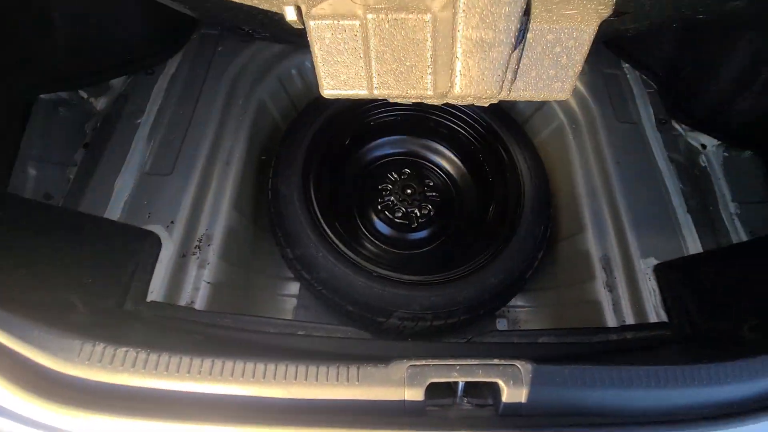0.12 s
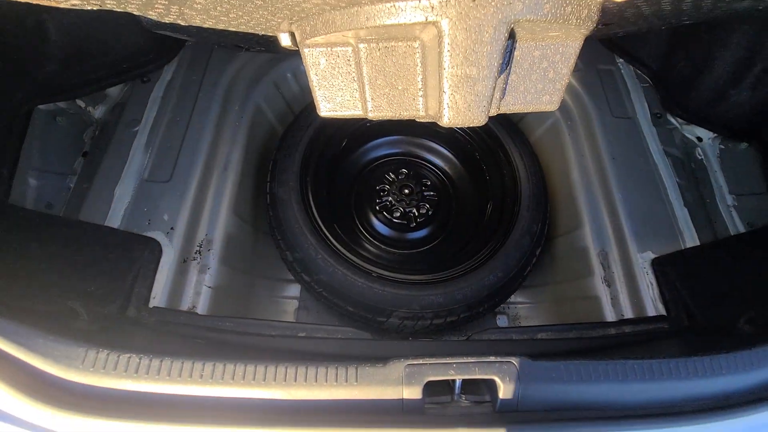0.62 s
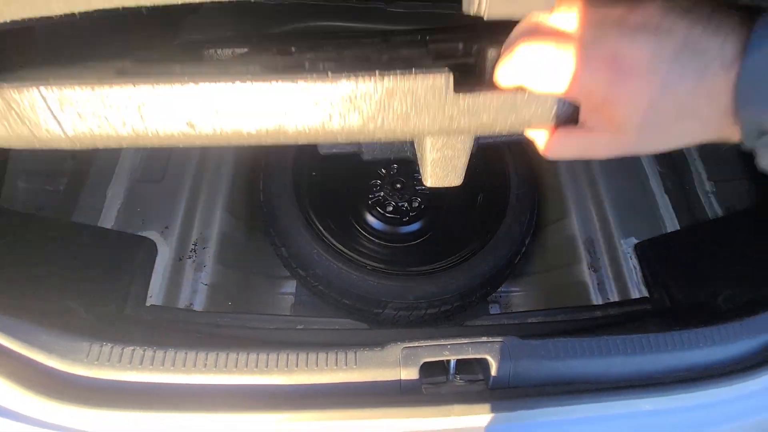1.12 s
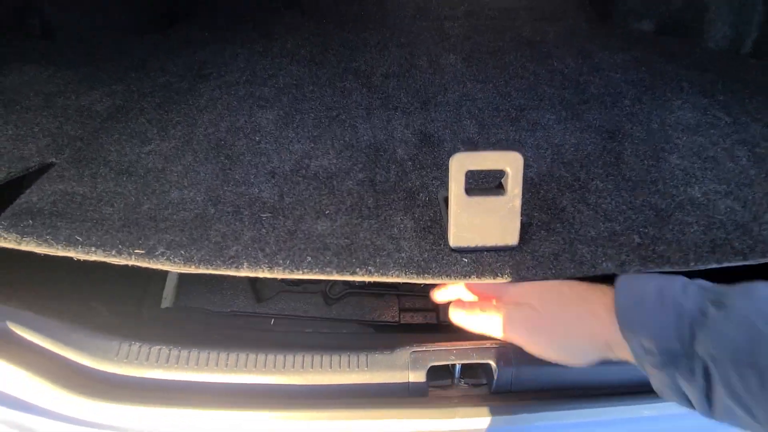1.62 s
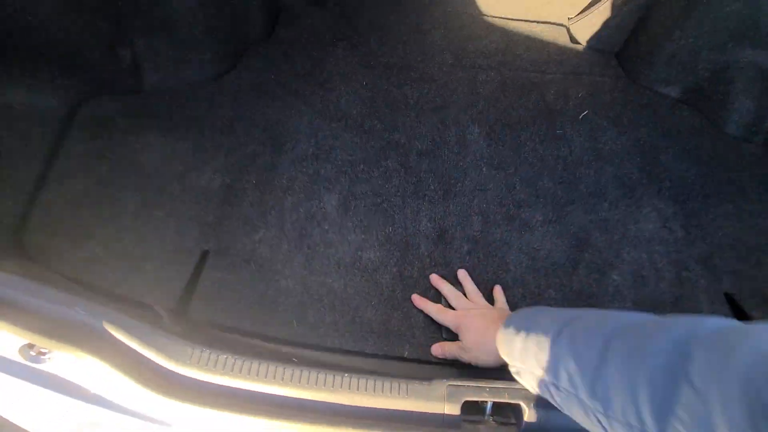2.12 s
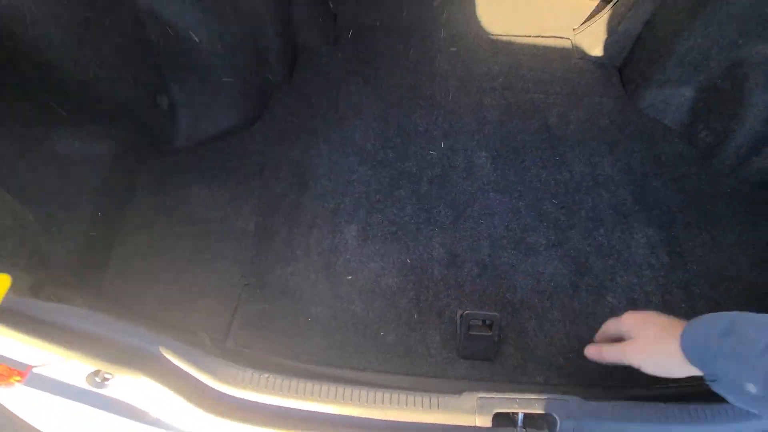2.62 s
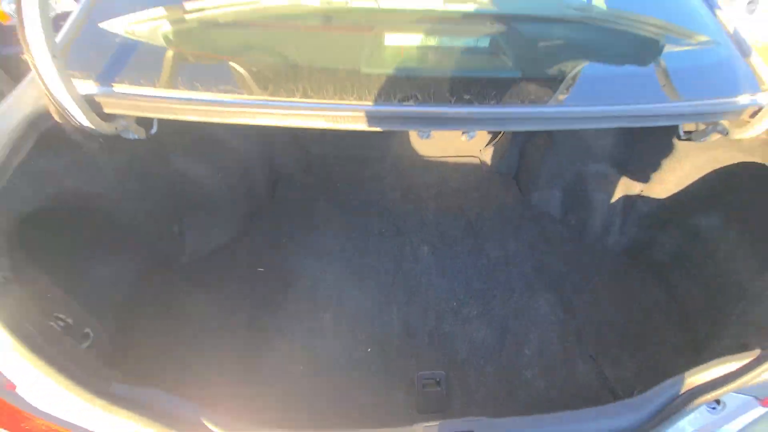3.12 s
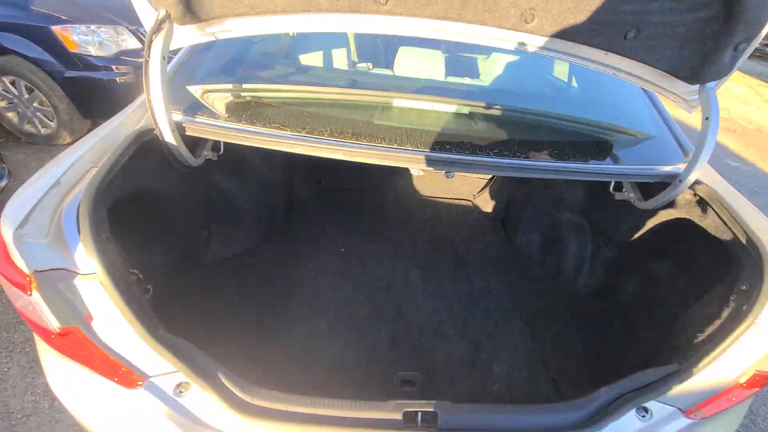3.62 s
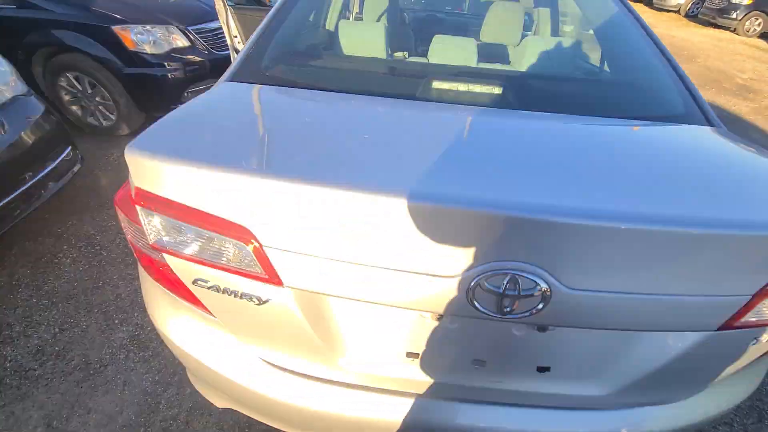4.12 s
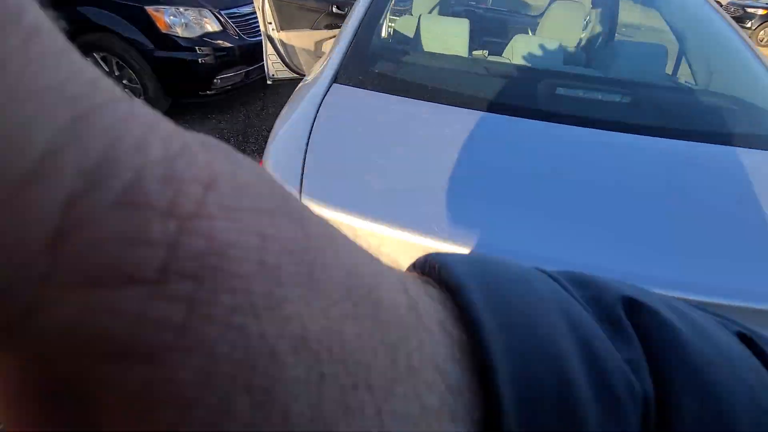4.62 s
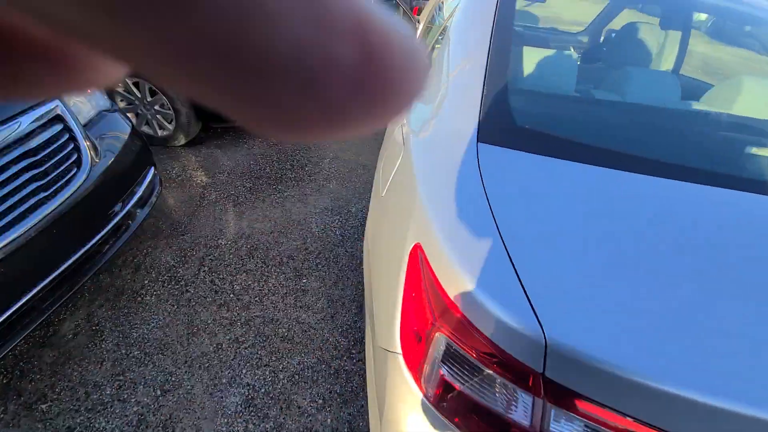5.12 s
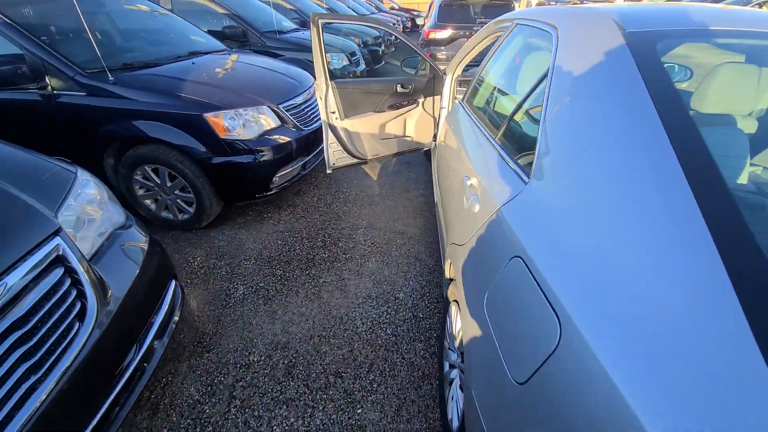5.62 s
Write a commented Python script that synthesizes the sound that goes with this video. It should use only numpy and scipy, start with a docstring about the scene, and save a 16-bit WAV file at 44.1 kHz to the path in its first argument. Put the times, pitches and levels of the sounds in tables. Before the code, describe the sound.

Outdoors in a car park, heard very close in stereo, low distant traffic rumbles and soft tyre wash wavers beneath. From 0 to 0.3 seconds the boot floor board gives abrupt hollow thumps, sharp ticks and coarse carpet scraping, then it falls nearly quiet. A faint bump comes at 1.1. From about 1.45 to 1.8 the board drops and slides in a dense clatter of dull thuds, edge knocks and shuddering drag. Lighter thumps at 2.1 to 2.6, strongest near 2.26, settle it. Faint scuffs and rustle follow around 3 to 3.4. At about 4.27 the lid slams: a deep steel boom with a hard latch clank, small rebounds and a fading rattle. From 4.65 sleeves rustle; between 4.9 and 5.3 grit snaps and crunches toward the left, with a heel knock near 5.03. Small scuffs and a faint low hum end it.

```python
"""Car boot floor and lid slam

Outdoors in a car park a hand drops and pats down a carpeted boot floor board, then slams the lid.
Decaying pushes ring damped modes: the board thumps, the lid booms, its latch clanks and a heel knocks.
Shaped noise makes the rustle of sleeves and carpet, crunching grit, far traffic and humming machinery.
Two close microphones share the bass and differ in the treble."""
import sys
import numpy as np
from scipy import signal
from scipy.fft import rfft, irfft, next_fast_len
from scipy.io import wavfile
from scipy.ndimage import uniform_filter1d

SR = 44100
rng = np.random.default_rng(int(sys.argv[2]) if len(sys.argv) > 2 else 0)


def unload_wav(signal):
    """Save mono or channel-first audio to the path in sys.argv[1] as 16-bit WAV at rate SR, clipped to [-1, 1]."""
    wavfile.write(
        sys.argv[1],
        SR,
        np.round(np.clip(np.atleast_2d(signal).T, -1, 1) * 32767).astype(np.int16),
    )


def voltage_ratio(level):
    """Linear amplitude factor for a level in decibels (scalar or array-like)."""
    return 10 ** (np.asarray(level, float) / 20)


N = 253575
T = np.arange(N) / SR

# left-right difference against the shared sound: f/Hz, level/dB
SIDE_SHARE = [(30, -27.5), (130, -11.5), (280, -10), (500, -0.5), (800, 0), (16000, 0.5)]
# boot sound reaches the right microphone round the housing: f/Hz, phase lag/rad
RIGHT_LAG = [(200, 0), (350, .6), (600, 1.3), (1000, 1.6), (16500, 1.6)]

# surroundings: t/s, rumble level/dB, tyre wash level/dB
SURROUNDINGS = [(0.0, -26, -50), (0.2, -30, -45.5), (0.5, -34.5, -46.5), (0.83, -31, -45),
                (1.1, -33.5, -44), (1.36, -29.5, -41), (1.75, -39, -41), (1.86, -42.5, -71),
                (2.07, -34.5, -47.5), (2.26, -26.5, -41), (2.42, -29, -69), (2.56, -37, -59),
                (2.91, -42, -51.5), (3.15, -40, -46.5), (3.55, -39, -47.5), (4.0, -40.5, -44),
                (4.3, -40.5, -41.5), (4.68, -40.5, -47), (5.06, -39.5, -48), (5.56, -45.5, -45.5),
                (5.75, -31, -43.5)]
# colour of the rumble: f/Hz, relative level/dB
RUMBLE_COLOUR = [(8.8, -57), (15, 8), (65, 12), (94, 5.5), (135, -3.5), (156, -4), (193, -18.5), (242, -5),
                 (300, -26), (390, -41), (660, -120)]
# colour of the tyre wash: f/Hz, relative level/dB
WASH_COLOUR = [(76, -33), (130, -3.5), (156, 4), (191, -1.5), (239, 0.5), (298, -8), (439, -11),
               (495, -7.5), (571, -12.5), (874, -11.5), (2660, -27), (7190, -62), (7800, -68), (15200, -45),
               (16500, -76)]
# machinery hums: f/Hz, looseness/Hz (3.9 / t60), level/dB, start t/s
HUMS = [(161.4, 4.8, -51, 2.57), (248.4, 1.2, -45.5, 5.03), (520.5, 7.3, -63, 2.63), (255.5, 46, -66, 0.5)]
# broad band heard while the microphones are deep in the boot: f/Hz, width/Hz, level/dB, end t/s
BOOT_WELL = (850, 300, -52, 1.1)

# strokes of cloth and carpet: peak t/s, swell/s, fade/s, hiss level/dB, scrape level/dB
STROKES = [(0.036, 0.11, 0.081, -33, -31), (0.151, 0.027, 0.066, -34, -22.5),
           (0.225, 0.062, 0.019, -43, -29), (0.29, 0.025, 0.047, -45.5, -34.5),
           (1.31, 0.27, 0.17, -41, -42.5), (1.445, 0.18, 0.053, -38.5, -34),
           (1.477, .012, 0.074, -37, -25.5), (1.671, 0.048, 0.11, -33, -50), (1.739, 0.09, 0.034, -49, -52),
           (2.09, 0.045, 0.25, -42, -49), (2.184, 0.16, 0.12, -38.5, -44.5),
           (3.371, 0.067, 0.15, -52.5, -42.5), (3.9, 0.28, 0.18, -49.5, -53.5),
           (4.654, 0.086, 0.12, -52, -41.5), (4.735, 0.08, 0.073, -43.5, -40),
           (4.78, 0.069, 0.043, -51, -45.5), (4.956, .12, 0.16, -46, -45), (5.054, 0.15, .2, -56, -55),
           (5.28, 0.091, 0.27, -51.5, -52.5)]
# faint rustle between strokes: t/s, hiss level/dB, scrape level/dB
RUSTLE = [(0.0, -52, -41), (0.39, -60, -67), (0.56, -71, -72.5), (0.96, -91, -69.5), (1.02, -62.5, -57.5),
          (1.1, -57.5, -48), (1.6, -48.5, -67), (1.8, -59, -72), (1.88, -70.5, -80), (1.97, -57.5, -78),
          (2.3, -58.5, -60), (2.5, -54, -53.5), (2.8, -65.5, -63.5), (3.13, -62, -57.5), (3.3, -62, -55.5),
          (3.5, -68, -62), (4.07, -65, -62), (4.22, -65.5, -61), (4.43, -55, -57), (4.85, -61, -62),
          (5.2, -54.5, -58), (5.45, -71.5, -55.5), (5.75, -60, -59.5)]
# where the rubbing sits: t/s, left minus right/dB
RUB_PAN = [(0.0, 1.5), (2.5, -1), (2.7, -2.5), (3.4, -10.5), (3.55, -4), (3.95, -7.5), (4.2, -4), (4.32, 8),
           (4.46, -5), (4.7, -18), (4.79, -15), (4.86, 10), (4.97, 3), (5.07, -2.5), (5.75, -1)]
# colour of the fine hiss: f/Hz, relative level/dB
HISS_COLOUR = [(1760, -25), (3000, -3), (5090, -10), (6620, -1.5), (8380, -9.5), (10500, -7), (11400, -2.5),
               (13300, -3.5), (15100, 4.5), (16200, -36), (16500, -49)]
# colour of the coarse scrape: f/Hz, relative level/dB
SCRAPE_COLOUR = [(240, -8.5), (400, -5.5), (746, -4.5), (962, -8), (1280, -7.5), (1380, -6), (2290, -12),
                 (3280, -10), (5000, -20.5), (6500, -27), (11000, -120)]

# hard ticks and the loudest stones: t/s, peak level/dB, centre f/Hz, snap level/dB, left minus right/dB
TICKS = [(0.1451, -8, 2980, -42, 2), (0.1605, -13.5, 3320, -16, -3), (0.1704, -23, 1670, -40, 1),
         (0.3734, -54, 1590, -29.5, -1.5), (0.992, -38, 1525, -36.5, 7), (1.2322, -36, 2620, -43, 3),
         (2.278, -32, 3030, -26, 2), (2.8903, -43, 1510, -63, 13), (3.1677, -40.5, 2270, -48, -10),
         (4.124, -39, 3420, -61, 8), (4.4595, -38.5, 1550, -62, 8), (4.9002, -31, 2200, -16.5, 21),
         (4.924, -28, 2250, -42, 19), (4.9496, -30, 3480, -46, 12), (4.9636, -27.5, 2550, -49, 17),
         (5.005, -27, 3600, -34, 11.5), (5.027, -26, 3020, -26, 17), (5.1603, -33.5, 2250, -30.5, 15.5),
         (5.218, -43, 1690, -60, 2)]
# soles scuffing briefly: t/s, peak level/dB, centre f/Hz
SCUFFS = [(0.2244, -42, 1640), (1.1704, -55, 1580), (2.089, -45, 1050), (3.003, -41, 1410),
          (3.0165, -37.5, 1350), (3.0347, -40.5, 1280), (3.6776, -37, 1390), (5.344, -38.5, 1670),
          (5.425, -32.5, 1340), (5.5183, -47, 1210)]
# ringing of one snapped stone: f/Hz, t60/s, relative level/dB
STONE_MODES = [(3320, 0.01, -6.5), (3980, 0.014, -1.5), (5480, 0.011, -7), (6660, 0.011, 0.5),
               (7440, 0.0093, -6)]
# ringing of the heel: f/Hz, t60/s, relative level/dB
HEEL_MODES = [(440, 0.019, -6), (816, 0.016, -1.5), (1115, 0.011, 0.5)]

# the lid lands, latches and bounces: t/s, panel peak level/dB, latch peak level/dB
LID_HITS = [(4.263, -26, -35), (4.275, -3, -10), (4.283, -3, -3.5), (4.293, -7, -20), (4.303, -9.5, -30),
            (4.326, -43, -24), (4.348, -10, -25.5), (4.37, -17.5, -49), (4.4, -22, -34),
            (4.439, -16.5, -37)]
# lid panel modes: f/Hz, t60/s, relative level/dB
LID_MODES = [(38.6, 0.28, 0), (79, 0.16, 0), (124.2, 0.57, -10.5), (170, 0.18, -7.5), (216, 0.32, -13),
             (264.5, 0.38, -11), (322, 0.11, -5), (387.6, 0.31, -7), (486, 0.22, -7.5), (559, 0.6, -11),
             (640, .15, -23), (768, 0.29, -11.5), (877, 0.1, -8.5)]
# latch modes: f/Hz, t60/s, relative level/dB
LATCH_MODES = [(640, .03, 0), (780, .03, -1), (1040, .03, 0), (1220, .02, -1), (1400, .02, -1),
               (1600, .02, -1), (1850, .015, -3), (2200, .012, -3), (2700, .015, -3), (3150, .02, -5),
               (3300, .025, -4), (3480, .015, -6), (4100, .008, -8), (5000, .006, -9)]
# colour of the lid's rattle: f/Hz, relative level/dB
BUZZ_COLOUR = [(100, -20), (200, -3), (400, 0), (850, 0), (1300, -13), (3300, -20), (4500, -32),
               (12000, -38), (16500, -40)]

# blows on the board: t/s, board peak level/dB, favoured f/Hz, boom peak level/dB, knock peak level/dB
BLOWS = [(0.016, -8, 101, -19, -21), (0.022, -7.5, 115, -29, -13), (0.144, -6.5, 102.4, -29, -23),
         (0.157, -13, 127, -25, -36), (0.169, -14.5, 407, -31, -27), (0.185, -15.5, 412, -35, -14.5),
         (0.217, -30, 103, -19, -23), (1.129, -25, 114, -32, -42), (1.475, -3.5, 327, -35, -15.5),
         (1.486, -5.5, 394, -25, -9), (1.506, -8.5, 150, -19, -14), (1.533, -12, 164, -10, -23),
         (1.576, -8, 148, -15, -21.5), (1.602, -6.5, 262, -12, -19), (1.644, -8.5, 190, -36, -11.5),
         (1.665, -3.5, 276, -28, -9), (1.710, -7.5, 244, -29, -10), (1.733, -5, 295, -37, -8.5),
         (1.75, -14, 170, -22, -20.5), (1.779, -15.5, 307, -28, -45), (1.791, -14.5, 131, -19.5, -36),
         (2.114, -24.5, 178, -43, -40), (2.159, -24.5, 220, -40, -29), (2.257, -10.5, 196, -12.5, -20),
         (2.276, -14, 283, -27, -18), (2.299, -18.5, 158, -32, -50), (2.358, -24, 159, -33, -41),
         (2.394, -21, 158, -33, -52), (2.466, -22.5, 144, -51, -48), (2.615, -17.5, 169, -43, -27),
         (3.275, -31, 180, -43, -55), (3.407, -29.5, 160, -46, -50)]
# low boom modes of the boot: f/Hz, t60/s, relative level/dB
BOOM_MODES = [(47, 0.19, 1.5), (62.8, 0.099, 8), (93.8, 0.43, -4.5)]
# board modes: f/Hz, t60/s, relative level/dB
BOARD_MODES = [(105.4, 0.13, -3.5), (122.8, 0.15, -2), (167.4, 0.18, -3.5), (217.2, 0.079, 0),
               (267, 0.091, 1.56), (313, 0.089, 1.5), (369, 0.072, 0.9), (408, 0.075, -0.7),
               (451, 0.058, 0.8), (530, 0.061, 2.5)]
# knocking modes of the board's edge: f/Hz, t60/s, relative level/dB
EDGE_MODES = [(620, .03, 0), (740, .03, -1), (880, .02, -2), (1020, .018, -2), (1180, .016, -2),
              (1370, .014, -3), (1620, .012, -4), (1900, .01, -5), (2300, .009, -7), (2750, .008, -9),
              (3300, .008, -11), (3900, .006, -16)]
# shudder of the sliding board: t/s, level/dB
SHUDDER = [(0.0, -24), (0.08, -34), (0.248, -33.5), (0.4, -53), (0.5, -77), (1.0, -71), (1.176, -42),
           (1.29, -43.5), (1.518, -29.5), (1.63, -23), (1.678, -14), (1.792, -30), (1.858, -54.5),
           (2.096, -49.5), (2.266, -27), (2.332, -43), (2.45, -47.5), (2.75, -61), (3.0, -74)]

STROKE_DEPTH_DB = 20  # drop over one swell or fade time
STROKE_ROUNDING = 1.25  # 1 = pointed peak, more = flatter top
TICK_WIDTH = 1.35  # band edges lie this ratio either side of the centre
TICK_CONTACT_S, SCUFF_CONTACT_S, SCUFF_PAN_DB = 0.00098, 0.018, 10
# grit crunches as the weight rolls over a shoe, fading
GRIT_FROM_S, GRIT_TO_S, GRIT_DB, GRIT_FADE_DB_PER_S = 4.935, 5.3, -29, 40
GRIT_HZ, GRIT_SNAP_UNDER_DB, GRIT_PAN_DB = 2700, 20, 15.5
GRIT_BUNCHING = 2.4  # above 1, stones crowd at the start
STONE_S, STONE_DB, STONE_PAN_DB = 4.9003, -14, 13
HEEL_S, HEEL_DB = 5.026, -11
BUZZ_FROM_S, BUZZ_DB, BUZZ_T60_S = 4.29, -25, 0.8
CRACK_UNDER_LATCH_DB, CRACK_UNDER_KNOCK_DB = 10, 16
CHATTER_S = 0.0084  # decay of the edge's rattling contact
SLAP_LO_HZ, SLAP_HI_HZ, SLAP_S, SLAP_UNDER_KNOCK_DB = 500, 950, 0.007, 6
SHUDDER_BOOM_DB, SHUDDER_EDGE_DB = -11, -13.5  # against the board's own shudder


def shape(x, table):
    """Colours a sound by f/Hz, level/dB points joined over log frequency."""
    hz, db = np.transpose(table)
    size = next_fast_len(N)
    f = np.maximum(np.fft.rfftfreq(size, 1 / SR), 1)
    gain = voltage_ratio(np.interp(np.log(f), np.log(hz), db))
    return irfft(rfft(x, size) * gain, size)[..., :N]


def unit(x):
    """Scales to rms 1."""
    return x / np.sqrt(np.mean(x ** 2))


def curve(table, column=1):
    """Joins one column by straight lines in time."""
    rows = np.array(table)
    return np.interp(T, rows[:, 0], rows[:, column])


def walk(rate):
    """Random wander of rms 1: levels held for 1 / rate seconds, then smoothed twice."""
    hold = int(SR / rate)
    steps = np.repeat(rng.standard_normal(N // hold + 1), hold)
    smooth = uniform_filter1d(uniform_filter1d(steps, hold), hold)
    return unit(smooth[:N])


def ears(pan_db):
    """Left and right gains for a left-minus-right level."""
    return voltage_ratio(np.array([pan_db, -pan_db]) / 2)


def air(colour, grain_db=0.):
    """Coloured noise of rms 1 with common bass and separate treble; grains make it crackle."""
    grains = voltage_ratio(grain_db * np.minimum(rng.exponential(size=(2, N)), 6))
    mid, side = rng.standard_normal((2, N)) * grains
    difference = shape(side, SIDE_SHARE) * np.array([[1], [-1]])
    return unit(shape(mid + difference, colour))


def ring(x, modes):
    """Drives damped resonances, each answering a unit push with its own amplitude."""
    out = 0
    for hz, t60, db in modes:
        r = np.exp(-np.log(1000) / (t60 * SR))
        w = 2 * np.pi * hz / SR
        out = out + voltage_ratio(db) * signal.lfilter([0, r * np.sin(w)], [1, -2 * r * np.cos(w), r * r], x)
    return out


def hollow(x, t60_s, wet_db):
    """Adds close reflections: a decaying noise tail for each microphone, thin in the bass."""
    decay = np.exp(-np.log(1000) * np.minimum(T / t60_s, 10)) * (T > 0.0003)
    tail = shape(rng.standard_normal((2, N)) * decay, SIDE_SHARE)[:, :int(0.4 * SR)]
    tail = tail / np.sqrt(np.sum(tail ** 2, axis=1, keepdims=True))
    return x + voltage_ratio(wet_db) * signal.fftconvolve(x, tail, axes=1)[:, :N]


def add(out, s, sound, db, pan_db=0.):
    """Places a sound at a peak level, then pans it."""
    i = int(s * SR)
    sound = sound * voltage_ratio(db) / np.max(np.abs(sound))
    out[:, i:i + len(sound)] += np.outer(ears(pan_db), sound)[:, :N - i]


def push(length_s, rough):
    """A decaying contact force; rough turns it into a rattle of small contacts."""
    t = np.arange(2048) / SR
    decay = np.exp(-t / length_s) * (1 - t / t[-1])
    return decay * (1 - rough + rough * rng.standard_normal(len(t)))


def strike(modes, force, favour_hz=None, spread=0.43, detune=0.045):
    """Modes of alternating sign answer a force; the spot hit may favour some, and all shift a little."""
    hz, t60, db = np.transpose(modes)[..., None]
    t = np.arange(int(min(0.35, t60.max()) * SR)) / SR
    if favour_hz:  # 6 dB down at spread octaves, 14 dB at most
        db = db - np.minimum(6 * (np.log2(hz / favour_hz) / spread) ** 2, 14)
    hz = hz * (1 + detune * rng.standard_normal(hz.shape))
    sign = (-1.) ** np.arange(len(hz))[:, None]
    decay = np.exp(-np.log(1000) * t / t60)
    ringing = np.sum(sign * voltage_ratio(db) * np.sin(2 * np.pi * hz * t) * decay, axis=0)
    return signal.fftconvolve(ringing, force)


def crack(length_s):
    """A dry treble snap: a rough push above 4.5 kHz."""
    return signal.sosfilt(signal.butter(2, 4500, "high", fs=SR, output="sos"), push(length_s, 0.54))


def crunch(hz, length_s):
    """A brief rough contact in a wide resonance."""
    band = signal.butter(2, [hz / TICK_WIDTH, hz * TICK_WIDTH], "band", fs=SR, output="sos")
    return signal.sosfilt(band, push(length_s, 1))


def round_housing(x):
    """Above the bass the right microphone lags by up to about a quarter cycle."""
    size = next_fast_len(N)
    lag = np.interp(np.fft.rfftfreq(size, 1 / SR), *np.transpose(RIGHT_LAG))
    right = irfft(rfft(x[1], size) * np.exp(-1j * lag), size)[:N]
    return np.array([x[0], right])


def traffic():
    """Far traffic: a throbbing low rumble and a smooth wash of tyres, both wandering noise."""
    rumble = air(RUMBLE_COLOUR) * voltage_ratio(curve(SURROUNDINGS, column=1) + 1.1 * walk(14))
    wash = air(WASH_COLOUR) * voltage_ratio(curve(SURROUNDINGS, column=2) + 2.04 * walk(17))
    return rumble + wash


def machinery():
    """Hums: noise through single resonances wavers, and each fades in over 0.55 s."""
    out = 0
    for hz, looseness, db, start in HUMS:
        hum = unit(ring(rng.standard_normal(N), [(hz, 3.9 / looseness, 0)]))
        out = out + voltage_ratio(db) * np.clip((T - start) / 0.55, 0, 1) * hum
    return out


def boot_well():
    """A broad resonance of noise, separate at each microphone, fading out as they leave the boot."""
    hz, width, db, until = BOOT_WELL
    band = unit(ring(rng.standard_normal((2, N)), [(hz, 2.2 / width, 0)]))
    return voltage_ratio(db) * np.clip((until - T) / 0.2, 0, 1) * band


def rub_level(stroke_db, stroking, column):
    """Adds the powers of all strokes and of the rustle between them."""
    return np.sqrt(voltage_ratio(2 * stroke_db) @ stroking + voltage_ratio(curve(RUSTLE, column)) ** 2)


def rubbing():
    """Fibres slip over fibres: a fine hiss and a coarser, grainy scrape, swelling with each stroke."""
    peak_s, swell_s, fade_s, hiss_db, scrape_db = np.transpose(STROKES)[..., None]
    away = np.maximum((peak_s - T) / swell_s, (T - peak_s) / fade_s)
    stroking = voltage_ratio(-2 * STROKE_DEPTH_DB * away ** STROKE_ROUNDING)  # power of each stroke
    hiss = air(HISS_COLOUR, 2.5) * rub_level(hiss_db[:, 0], stroking, column=1) * voltage_ratio(1.2 * walk(60))
    scrape = air(SCRAPE_COLOUR, 3.) * rub_level(scrape_db[:, 0], stroking, column=2) * voltage_ratio(1.5 * walk(60))
    return (hiss + scrape) * ears(curve(RUB_PAN))


def grit(count):
    """Random small stones, bunched early and fading, in the columns of TICKS."""
    when, colour, size = rng.random((count, 3)).T
    late_s = (GRIT_TO_S - GRIT_FROM_S) * when ** GRIT_BUNCHING
    db = GRIT_DB - GRIT_FADE_DB_PER_S * late_s - 12 * size
    hz = GRIT_HZ * 1.7 ** (colour - 0.5)
    return list(zip(GRIT_FROM_S + late_s, db, hz, db - GRIT_SNAP_UNDER_DB, GRIT_PAN_DB + 0 * db))


def ticks_and_shoes():
    """Hard contacts crunch and snap, soles scuff longer, one stone rings and one heel knocks hollow."""
    out = np.zeros((2, N))
    for s, db, hz, snap_db, pan_db in TICKS + grit(count=34):
        add(out, s, crunch(hz, TICK_CONTACT_S), db, pan_db)
        add(out, s, crack(TICK_CONTACT_S), snap_db, pan_db)
    for s, db, hz in SCUFFS:
        add(out, s, crunch(hz, SCUFF_CONTACT_S), db, SCUFF_PAN_DB)
    add(out, STONE_S, strike(STONE_MODES, push(0.0001, 0), detune=0), STONE_DB, STONE_PAN_DB)
    add(out, HEEL_S, strike(HEEL_MODES, push(0.00032, 0), detune=0), HEEL_DB, 6.)
    return hollow(out, 0.025, -11)


def lid_rattle():
    """After the slam the lid and its trim rattle out as dull, decaying noise."""
    after = np.maximum(T - BUZZ_FROM_S, 0)
    level_db = BUZZ_DB - 60 * after / BUZZ_T60_S + 2.9 * walk(45)
    return air(BUZZ_COLOUR, 2.) * voltage_ratio(level_db) * (after > 0)


def lid():
    """A steel panel booms on its rubber seal while the latch clanks and cracks, then rattles out."""
    out = np.zeros((2, N))
    for s, db, latch_db in LID_HITS:
        add(out, s, strike(LID_MODES, push(0.0013, 0.16), detune=0.043), db)
        add(out, s, strike(LATCH_MODES, push(0.016, 0.7), detune=0.03), latch_db, 6.)
        add(out, s, crack(0.018), latch_db - CRACK_UNDER_LATCH_DB)
    return hollow(out, 0.101, -3.5) + lid_rattle()


def shudder():
    """The sliding board drags: steady noise drives its modes, the boot's boom and the edge."""
    drag = rng.standard_normal(N)
    body = unit(ring(drag, BOARD_MODES))
    boom = voltage_ratio(SHUDDER_BOOM_DB) * unit(ring(drag, BOOM_MODES))
    edge = voltage_ratio(SHUDDER_EDGE_DB) * unit(ring(drag, EDGE_MODES))
    return (body + boom + edge) * voltage_ratio(curve(SHUDDER) + 1.45 * walk(39.16))


def board():
    """Each blow rings the board, booms the boot, knocks the edge, slaps the carpet and cracks."""
    out = np.zeros((2, N))
    slap = signal.butter(2, [SLAP_LO_HZ, SLAP_HI_HZ], "band", fs=SR, output="sos")
    for s, db, favour_hz, boom_db, knock_db in BLOWS:
        add(out, s, strike(BOARD_MODES, push(0.00027, 0.62), favour_hz), db)
        add(out, s, strike(BOOM_MODES, push(0.00071, 0)), boom_db)
        add(out, s, strike(EDGE_MODES, push(CHATTER_S, 0.5)), knock_db, 4.)
        add(out, s, signal.sosfilt(slap, push(SLAP_S, 1)), knock_db - SLAP_UNDER_KNOCK_DB)
        add(out, s, crack(0.0099), knock_db - CRACK_UNDER_KNOCK_DB, 1.5)
    return hollow(out + shudder(), 0.022, -1.55)


def scene():
    """Lays everything near the boot over the car park."""
    surroundings = traffic() + machinery() + boot_well()
    return surroundings + rubbing() + ticks_and_shoes() + round_housing(lid() + board())


def roll_off(x):
    """The treble ends steeply here."""
    return signal.sosfilt(signal.butter(12, 16990, fs=SR, output="sos"), x)


def record(dry):
    """The microphones lose the deepest bass and the very top and round off the loudest peaks."""
    no_rumble = signal.sosfilt(signal.butter(1, 20, "high", fs=SR, output="sos"), dry)
    no_top = signal.sosfilt(signal.ellip(8, 0.5, 50, 16300, fs=SR, output="sos"), no_rumble)
    mix = np.tanh(0.81 * no_top) / 0.79
    return roll_off(mix)


dry = scene()
out = record(dry)
unload_wav(out)
```